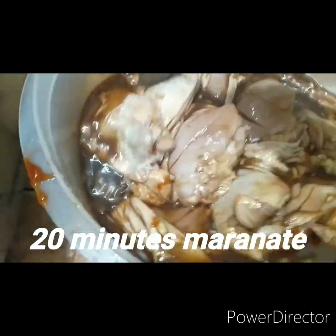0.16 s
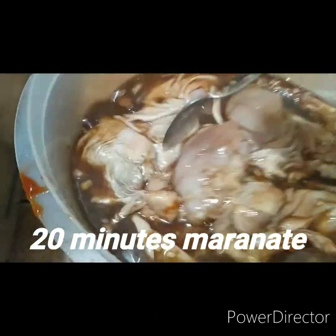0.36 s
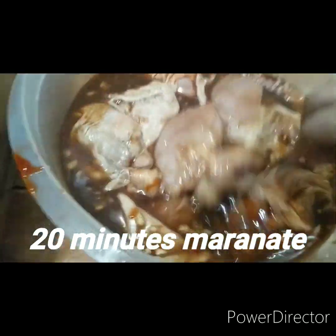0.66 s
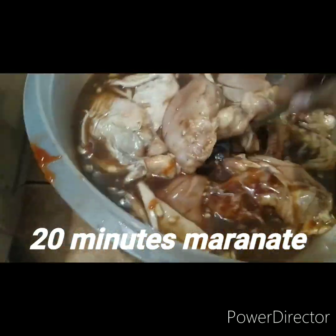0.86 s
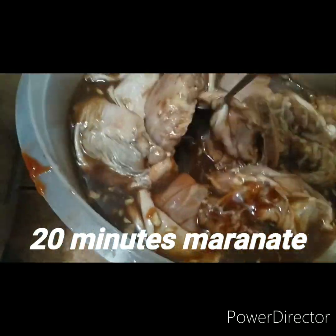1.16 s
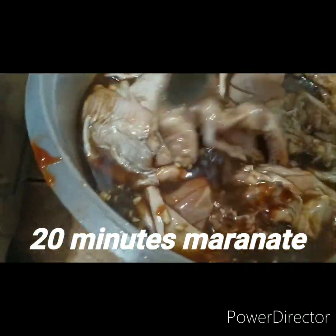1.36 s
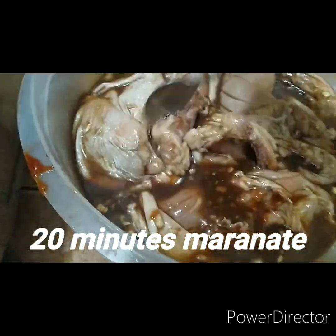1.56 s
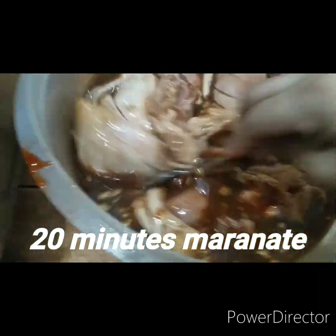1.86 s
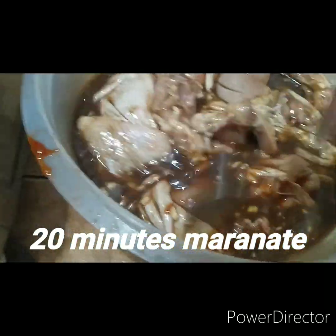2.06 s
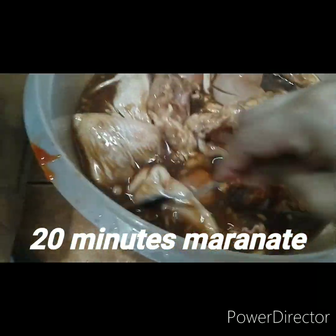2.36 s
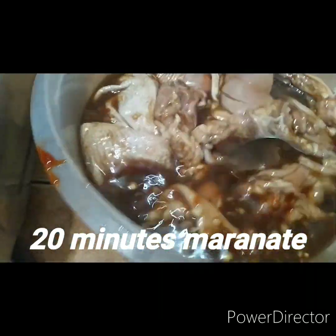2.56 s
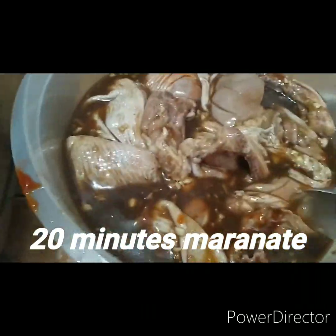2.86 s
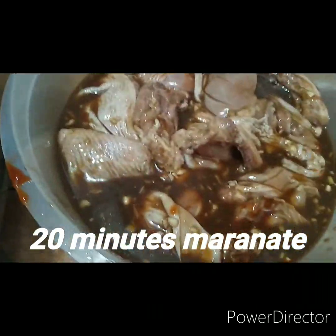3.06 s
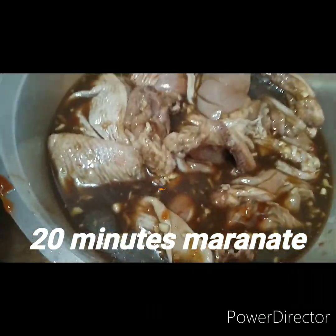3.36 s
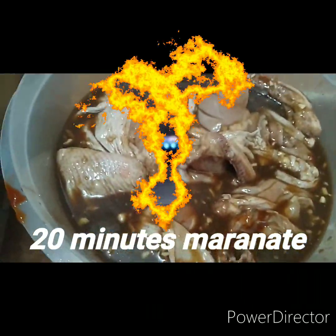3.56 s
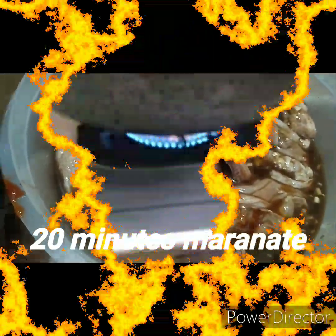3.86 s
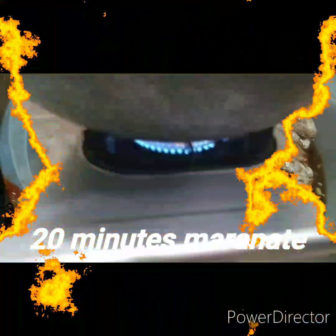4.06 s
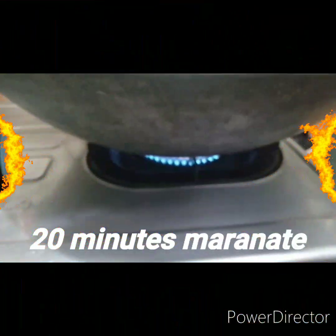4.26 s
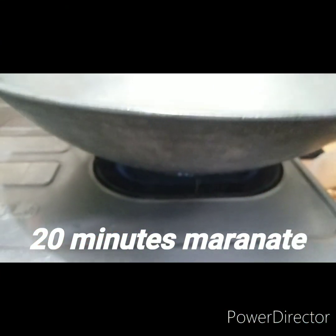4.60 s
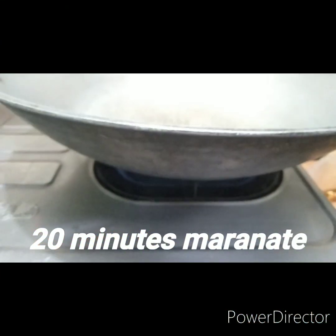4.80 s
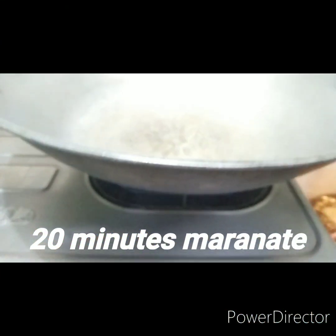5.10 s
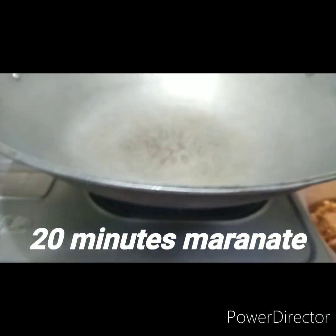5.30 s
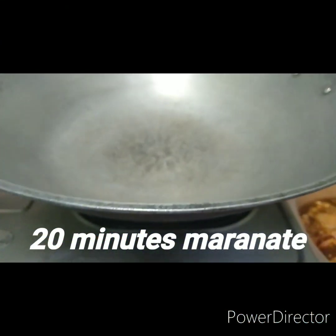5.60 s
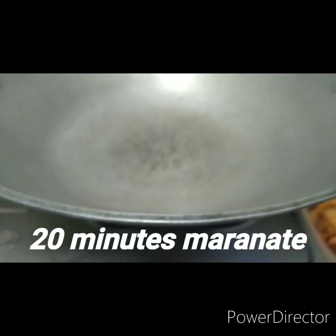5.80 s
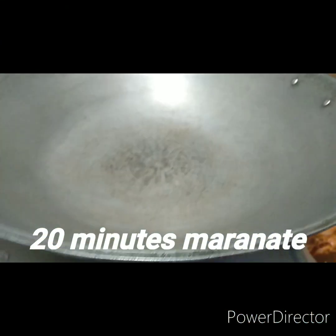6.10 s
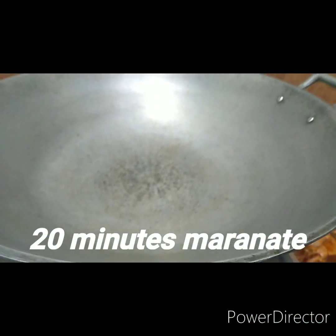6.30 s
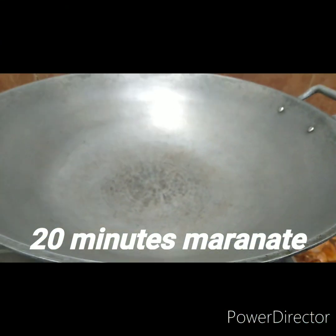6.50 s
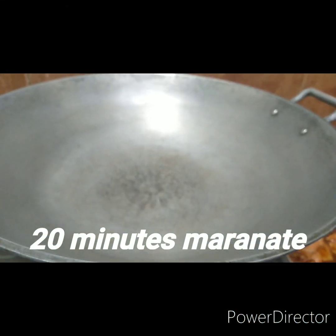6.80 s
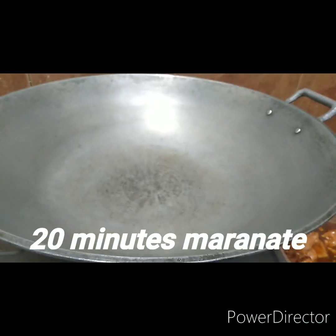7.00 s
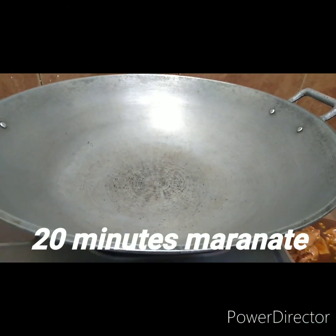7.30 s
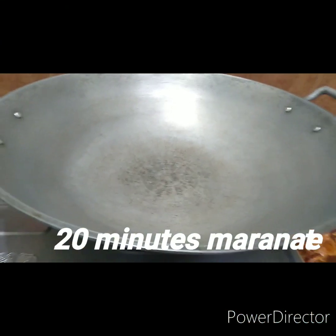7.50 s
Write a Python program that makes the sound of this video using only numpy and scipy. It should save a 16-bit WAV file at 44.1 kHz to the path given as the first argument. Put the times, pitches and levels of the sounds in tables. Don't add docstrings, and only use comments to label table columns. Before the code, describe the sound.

In a small kitchen, close microphone, quiet hiss and low hum carry tiny wet ticks and a faint high whistle. A metal spoon then knocks a meat-filled bowl with short damped clacks and small wet pops, followed by bright gritty scrapes. After a brief silence, a gas stove hisses over a fuller hum, with soft pan thuds, then a light clink and a louder, rattling metal clink.

```python
import sys
import numpy as np
from scipy import signal
from scipy.fft import rfft, irfft
from scipy.io import wavfile

SR = 44100
rng = np.random.default_rng(int(sys.argv[2]) if len(sys.argv) > 2 else 0)


def materialize(psi):
    bounded = np.clip(np.atleast_2d(psi).T, -1, 1)
    quanta = np.round(bounded * 32767).astype(np.int16)
    wavfile.write(sys.argv[1], SR, quanta)


def rack_gain(trim_db):
    fader = np.asarray(trim_db, float)
    return 10 ** (fader / 20)


N = 337365

# [t/s, peak level/dB, dull thump level/dB, ring tilt/(dB per octave), bright click level/dB]
KNOCKS = [(1.743, -36, -21, -12, -22), (2.196, -13.5, -28, 4, 0.5), (2.213, -26, -28, 5, -17),
          (2.4427, -14.5, -42, 0, -11), (2.462, -47, -31, -4, -20), (2.8005, -13.5, -10, 2, -2),
          (2.895, -17, -17, -1.5, -9), (2.995, -27, -9, -4, 2), (3.205, -23, -18, 14, 5),
          (3.346, -21.5, -16, -9.5, 3.5), (3.364, -26, -32, -13, -5), (0.855, -31.5, -37, -14, -20),
          (2.9442, -39, -23, -5, -32), (3.323, -35, -27, -4, -36)]
PLACE_UNTIL = [2.3, 2.6, 2.85]
CONTACT_LENGTHS = [2.3, 4.2, 2.85, 2.1]
# [f/Hz, t60/s, level/dB at each of four places]
BOWL_MODES = [(674, 0.015, -10, -18, -13, -11), (810, 0.03, -11, -1.5, -11, -9),
              (960, 0.023, -8, -9, -15, -19), (1200, 0.034, -16, 0, 1.5, 2), (1335, 0.028, 5.5, -9, -4, -2),
              (1552, 0.021, -4, -4, -0.5, -2), (1750, 0.018, -10, -3, -2, -3),
              (2063, 0.02, -4.5, -8.5, -1.5, 7), (2200, 0.016, -3, -10, -10, 2),
              (2442, .022, 4.5, 3.5, -20, -5), (2680, 0.016, -11, -7.5, -21, -13),
              (2870, 0.018, -2, -14, -18, -11), (3400, 0.0085, -15, -10, -13, -7),
              (3750, 0.0073, -16, -10, -12, -16)]
# [f/Hz, level/dB, t60/s]
LOAD_MODES = [(171, -18, 0.037), (365, 10, 0.024), (462, 10.5, 0.046)]
# [f/Hz, level/dB, t60/s]
CLICK_MODES = [(4480, -16, 0.001), (5740, -11, 0.004), (7000, -13, 0.0021), (8200, -9, 0.002),
               (10450, 2, 0.0024), (11500, -7.5, 0.0074)]
# [t/s, level/dB, f/Hz]
BOWL_ROCKS = [(1.86, -45, 186), (1.869, -46, 128), (2.038, -44, 178), (2.55, -62, 290)]
# [t/s, peak level/dB, f/Hz, t60/s]
STRAY_NOTES = [(2.1963, -25, 1320, .015), (2.1972, -25, 2450, .012), (2.2035, -33, 1750, .03),
               (2.895, -17, 2050, .024), (2.8975, -34, 430, .05), (2.899, -31, 2550, .025),
               (2.895, -29, 3700, .012), (2.8953, -25, 1200, .035), (3.2043, -25, 2330, .018),
               (3.2055, -33, 850, .02), (3.3468, -27, 1350, .02), (3.7484, -34, 2300, .01),
               (3.7486, -38, 3900, .012), (4.548, -39, 920, .04), (4.536, -35, 690, .02),
               (2.4435, -27, 1650, .015), (2.8015, -29, 520, .025), (5.389, -39, 5300, .025),
               (5.389, -40, 4600, .03), (5.4075, -42, 2300, .04), (5.4575, -42, 3050, .03),
               (5.4585, -47, 5100, .03), (5.4615, -42, 1600, .025)]
# [t/s, rise/s, hold/s, bright ring level/dB, body rub relative level/dB]
STROKES = [
    (3.203, 0.0029, 0.009, -31, -24),
    (3.3457, 0.0007, 0.0069, -25, -5.5),
    (3.353, 0.0034, 0.051, -29, -8.5),
    (3.412, .004, .012, -40, -8),
    (3.6662, .001, 0.005, -37, -8),
    (3.680, 0.015, .034, -27.5, -28),
    (3.747, .004, .006, -41, 5),
]
DRAG_UNTIL = [3.33, 3.6]
# [t/s, level/dB]
LANDINGS = [(3.2041, -23), (3.3463, -19), (3.6674, -38)]
# [t/s, extra force/dB]
CATCHES = [(3.2062, -2), (3.2132, 9), (3.2165, 5), (3.229, 3), (3.234, 3), (3.240, 4), (3.2483, 4),
           (3.2555, 3), (3.3485, 6), (3.353, 8), (3.3565, 6), (3.3590, 2), (3.3650, 7), (3.3703, 5),
           (3.3750, 2), (3.3815, 2), (3.3856, 4), (3.3896, 2), (3.3968, 5), (3.3997, 4), (3.4017, 5),
           (3.4066, 1), (3.4096, -3), (3.4135, -2), (3.431, 3), (3.4416, 3), (3.6697, 5), (3.6843, 8),
           (3.6907, 6), (3.6961, 6), (3.700, 6), (3.7038, 5), (3.7064, 2), (3.7095, 3), (3.7121, 6),
           (3.7210, 5), (3.7281, 4), (3.7313, 3), (3.7416, 2), (3.7485, 3), (3.7559, 5)]
# [f/Hz, level/dB in first, second, third drag, t60/s]
SPOON_MODES = [(3625, -35, -30, -19, 0.046), (4000, -35, -29, -17, .04), (4680, -18, -20, -22, 0.025),
               (5060, -26, -19, -13, 0.048), (5380, -29.5, -20, -18, .03), (6630, -15, -19, -21, 0.025),
               (7570, -14, -14.5, -32, .015), (8050, -15, -17, -19, .07), (8400, -19, -16, -21, .015),
               (8980, -20, -20, -11, 0.11), (9250, -7.5, -19, -14, 0.023), (9710, -15, -5, -10, .022),
               (10185, -11, -4, -6, 0.03), (10500, -13, -17, -10, .02), (10730, -2, -5, -4, 0.032),
               (11090, -5, 0.5, -2, 0.04), (11250, -12, -4, -8, 0.016), (12480, -12, -15, -18, .02),
               (12050, 3, -12, -22, .035), (12300, -19, -12, -14, 0.0204), (13400, -21, -16, -16, 0.03),
               (14000, -15, -12, -8, .03), (14600, -21, -10, -12, .015), (15150, -21, -14, -11, .015)]
GRIT_LEVELS = [-1, -3, -4]
# [f/Hz, level/(dB per Hz)]
GRIT_COLOUR = [(290, -51), (500, -20.5), (726, -27), (968, -7.5), (1150, -27), (1600, -8.5), (3680, -11.5),
               (4500, -21), (7030, -18.5), (10800, -3), (15500, -19)]
# [f/Hz, width/Hz]
DRAG_NOTCHES = [(6120, 330), (7050, 350)]
# [t/s, rise/s, hold/s, rms level/dB]
SLOSHES = [(2.897, .003, .004, -52), (2.916, 0.019, 0.016, -38), (3.488, .01, 0.011, -56),
           (3.556, 0.016, 0.039, -50), (3.66, .015, .008, -56)]
# [t/s, peak level/dB, f/Hz, t60/s]
PLOPS = [(2.4635, -37, 2980, .012), (2.467, -38, 1000, .03), (2.9315, -33, 1400, .015),
         (2.937, -31, 1500, .015), (2.9445, -29, 1500, 0.014), (2.9490, -34, 1300, .015),
         (2.9545, -35, 1500, .015), (2.9635, -37, 2100, .01), (2.9715, -41, 1400, .012),
         (2.995, -31.5, 1200, .02), (2.2005, -29, 2400, .02), (2.2055, -33, 2000, .02),
         (2.219, -33, 2100, .02), (2.2245, -40, 2700, .015), (2.9025, -32, 2290, .015),
         (.856, -35, 1300, .012), (.8565, -40, 2300, .008), (2.4440, -27, 2500, .015),
         (2.4455, -30, 1200, .025), (2.803, -27, 1900, .012)]
# [t/s, peak level/dB, f/Hz]
TICKS = [(.1274, -61, 6140), (.1999, -40, 11500), (.214, -57, 7000), (0.243, -40, 9600),
         (.2768, -38, 11500), (.4494, -46, 14300), (.4853, -42, 10800), (.6898, -39, 11000),
         (.69, -38, 13000), (1.1613, -35.5, 10500), (1.3992, -39, 13000), (1.5374, -45, 8400),
         (1.8362, -43, 10100), (6.13, -38, 12500), (6.3964, -59, 5180), (7.0818, -37, 12800),
         (7.2004, -45, 12200)]
# [t/s, peak level/dB, sharp edge level/dB]
PAN_THUDS = [(4.162, -34, -12), (4.5262, -26, -18), (4.5312, -18.5, -20), (4.5412, -23, -30),
             (4.6195, -26, -24), (4.631, -34, -24)]
# [f/Hz, level/dB, t60/s]
PAN_MODES = [(700, 3, 0.02), (790, -1, 0.012), (900, 2, 0.02)]
# [f/Hz, level/dB, t60/s]
PAN_EDGE_MODES = [(1960, -8, .02), (2500, -5, .015), (2920, 4, .015), (3270, 2, .015), (4700, -7, .025),
                  (5600, -9, .015)]
# [t/s, peak level/dB, lowest f/Hz, length/ms]
SNAPS = [
    (4.533, -32, 2000, 3.0),
    (5.3887, -32, 3500, 6.0),
    (5.457, -36, 2800, 8.0),
    (5.693, -27, 1900, 12),
]
# [t/s, peak level/dB]
CLINKS = [
    (5.3894, -26),
    (5.692, -14),
]
# [f/Hz, level/dB at first clink, level/dB at second clink, t60/s]
METAL_MODES = [(2000, -38, -12, 0.13), (2150, -26, -10, 0.11), (2330, -5, -0.5, 0.071),
               (2377, -22, 0.5, 0.045), (2520, -23, -4.5, 0.035), (2810, -9, -5, 0.055),
               (2620, -19, -9, 0.037), (3110, -9, -16, .04), (3272, 3.5, -18, 0.05), (3310, -7, -14, 0.074),
               (3663, -20, -11.5, 0.13), (4280, -9, -18, 0.036), (4610, -7, -10.5, 0.066),
               (5200, -12, -21, 0.071), (5610, -10, -6, 0.075), (6830, -15, -8.5, 0.059),
               (6830, -19, -29, 0.045), (7670, -24, -25, .05), (11400, -11, -19, .02),
               (13500, -19, -17, 0.1), (14800, -18, -11, 0.022)]
# [t/s after the clink, level/dB]
CLINK_BOUNCES = [(.0062, -4), (.013, -14)]
# [t/s, rise/s, hold/s, f/Hz, rms level/dB]
SQUEAKS = [(1.94, 0.05, .17, 4500, -63), (3.532, .008, 0.12, 2770, -57.5),
           (3.537, 0.035, 0.21, 3810, -59.5)]
# [t/s, f/Hz, rms level/dB]
WHISTLE = [(.445, 9950, -75), (.47, 9880, -60), (.50, 9800, -56), (.525, 9800, -63), (.56, 9760, -57),
           (.595, 9660, -54), (.63, 9580, -62), (.645, 10020, -61), (.67, 9980, -55), (.705, 9860, -56),
           (.73, 9800, -68), (.76, 9950, -60), (.80, 9890, -56), (.825, 9980, -57), (.85, 9790, -55),
           (.89, 9850, -57), (.93, 9900, -63), (.97, 9830, -76)]
# [t/s, height/full scale, rise/s]
LURCHES = [(3.198, -0.026, 0.0092), (3.219, 0.02, 0.024), (3.34, -0.028, 0.0093), (3.375, 0.013, 0.035),
           (3.45, -0.0068, 0.059), (3.731, 0.00099, 0.026), (4.043, 0.03, 0.047)]
# [f/Hz, level/(dB per Hz)]
BOWL_ROOM = [(180, -48), (300, -35), (326, -13), (446, -11), (501, -5.5), (745, -6.5), (986, -4),
             (1440, -6.5), (2330, -8.5), (3300, -16), (4590, -21), (5330, -23.5), (8050, -27),
             (10800, -15.5), (15600, -29)]
STOVE_ROOM = [(210, -7.5), (360, -4.5), (421, -2), (509, -7.5), (596, 0), (676, -4.5), (732, -2.5),
              (972, -3), (1400, -2), (2210, -5), (3380, -11), (8170, -27), (10500, -23), (12900, -14),
              (15600, -27.5)]
# [f/Hz, width/Hz, rms level/dB]
BOWL_HUM = [(24, 34, -62.5), (73.8, 9.5, -64.5), (116, 14, -70), (144.6, 25.4, -57.5), (178, 19, -65.5),
            (243, 110, -70), (1000, 32, -61)]
STOVE_HUM = [(24.1, 21, -61.5), (91.7, 9.2, -58.5), (133, 20, -66.5), (163, 33, -57.5),
             (207.8, 21.6, -56.5), (243.3, 16, -54.5), (295.6, 32.5, -51.5), (346.6, 13, -62.5),
             (425, 13, -65), (6900, 250, -76), (13680, 50, -70)]
# [f/Hz, rms level/dB]
MOTORS = [
    [(39, -59.5), (78, -64.5)],
    [(46, -60.5), (92, -73)],
]
# [t/s, depth/dB, time
# to deepest/s]
DUCKS = [
    (.15, -1, 0.099),
    (1.15, -1, 0.17),
    (2.2, -2.5, 0.088),
    (3.215, -15.5, 0.046),
    (3.35, -3.5, 0.094),
]
# [t/s, length/s, f/Hz, width/Hz]
DROPOUTS = [(3.375, .075, 6050, 260), (3.365, .04, 6850, 250), (3.685, .08, 6150, 360),
            (3.69, .062, 7150, 620), (3.715, .03, 4650, 200)]

HISS_TOP_HZ = 15480


def knocks():
    out = np.zeros(N)
    for s, db, thump_db, tilt_db, click_db in KNOCKS:
        place = np.searchsorted(PLACE_UNTIL, s)
        contact_ms = CONTACT_LENGTHS[place]
        contact = crack(contact_ms)
        touch = contact * np.exp(-1000 * np.arange(len(contact)) / SR / (0.75 * contact_ms))
        body = 0
        for hz, t60, *place_db in BOWL_MODES:
            mode_db = place_db[place] + tilt_db * np.log2(hz / 1500)
            body = body + rack_gain(mode_db) * peak_one(ring(touch, hz, t60))
        body = above(above(body, 660), 410)
        click_sound = above(contact, 3400)
        click_sound += sum(rack_gain(d) * peak_one(ring(contact, hz, t60)) for hz, d, t60 in CLICK_MODES)
        load = above(sum(rack_gain(d) * ring(np.abs(contact), hz, t60) for hz, d, t60 in LOAD_MODES), 130)
        hit = peak_one(body) + rack_gain(click_db) * peak_one(click_sound) + rack_gain(thump_db) * peak_one(load)
        place_at(out, s, rack_gain(db) * hit)
    return out + sum(strike([s], db, hz, 0.34) for s, db, hz in BOWL_ROCKS)


def spoon_drags():
    bright, body = drag_forces()
    grit = grains(7000, 2.6) * rack_gain(2.4 * drift(300))
    catch_rise_s = 0.0008
    catch_db = sum(db * bump(s, catch_rise_s) for s, db in CATCHES)
    out = (rack_gain(np.array(GRIT_LEVELS)) @ bright) * rack_gain(0.35 * catch_db - 2.5) * coloured(grit, GRIT_COLOUR)
    bright *= rack_gain(catch_db - 2.5)
    caught = np.round((np.array(CATCHES)[:, 0] + catch_rise_s) * SR).astype(int)
    landing_s, landing_db = np.transpose(LANDINGS)
    for k, (hz, *db, t60) in enumerate(SPOON_MODES):
        force = rack_gain(np.array(db)) @ bright
        drive = rack_gain(-19) / np.sqrt(t60 * 100) * np.roll(grit, k * k * 20) * force
        drive[caught] += rack_gain(-6) * force[caught]
        landed = np.round((landing_s + rng.uniform(0, 0.0019)) * SR).astype(int)
        drive[landed] += rack_gain(landing_db + db)
        out += ring(drive, hz, t60)
    for hz, width_hz in DRAG_NOTCHES:
        out = between(out, hz - width_hz / 2, hz + width_hz / 2, 2, "bandstop")
    wet = grains(1500, 3.8) * body
    rubbed = 0
    for k, (hz, t60, *db) in enumerate(BOWL_MODES):
        rubbed = rubbed + rack_gain(np.mean(db) - 25) * ring(np.roll(wet, k * 10), hz, 0.54 * t60)
    return above(out, 450) + above(rubbed, 620)


def drag_forces():
    ring_fall, rub_fall, slosh_fall = 800, 420, 650
    bright, body = np.zeros((3, N)), np.zeros(N)
    for s, rise_s, hold_s, db, rub_db in STROKES:
        drag = np.searchsorted(DRAG_UNTIL, s)
        if drag == 0:
            pace = 0.38
        elif rise_s < 0.003:
            pace = 2499 / ring_fall
        else:
            pace = 1
        bright[drag] += rack_gain(db) * swell(s, rise_s, hold_s, pace * ring_fall)
        body += rack_gain(db + rub_db) * swell(s, rise_s, hold_s, pace * rub_fall)
    body += sum(rack_gain(db) * swell(*shape, slosh_fall) for *shape, db in SLOSHES)
    return bright, body


def stray_notes():
    out, click = np.zeros(N), unit_click()
    for s, db, hz, t60 in STRAY_NOTES:
        place_at(out, s, rack_gain(db) * peak_one(ring(ring(click, hz, t60), hz, 3 / hz)))
    return out


def plops():
    out, click = np.zeros(N), unit_click()
    for s, db, hz, t60 in PLOPS:
        pair = ring(click, 0.94 * hz, t60) + ring(click, 1.13 * hz, t60)
        place_at(out, s, rack_gain(db) * peak_one(ring(pair, hz, 0.35 * t60)))
    return out


def ticks():
    out, click = np.zeros(N), unit_click()
    for s, db, hz in TICKS:
        for pitch_hz in (0.93 * hz, min(1.075 * hz, 15200)):
            burst = ring(ring(click, pitch_hz, 44 / hz), pitch_hz, 37 / hz)
            place_at(out, s, rack_gain(db - 19.5) * burst)
    return out


def pan_thuds():
    s, db, edge_db = np.transpose(PAN_THUDS)
    body = sum(strike(s, db + d - 3.5, hz, t60) for hz, d, t60 in PAN_MODES)
    body = between(above(above(body, 700), 700), 610, 1100, 3)
    return body + sum(strike(s, db + edge_db + d - 5.5, hz, t60) for hz, d, t60 in PAN_EDGE_MODES)


def clinks():
    s, db = np.transpose(CLINKS)
    rattle = drift(180)
    out = 0
    for k, (hz, first, second, t60) in enumerate(METAL_MODES):
        mode = strike(s, db + np.array([first, second]) - 10, hz, t60)
        out = out + mode * rack_gain(3.5 * np.roll(rattle, k * SR // 10))
    out = above(out, 2250)
    return out + sum(rack_gain(d) * np.roll(out, round(lag * SR)) for lag, d in CLINK_BOUNCES)


def snaps_and_rustle():
    out = np.zeros(N)
    for s, db, low_hz, length_ms in SNAPS:
        place_at(out, s, rack_gain(db) * above(crack(length_ms), low_hz))
    brush = swell(4.882, 0.0049, 0.011, 940)
    return out + rack_gain(-41) * brush * coloured(grains(4000, 2.8), STOVE_ROOM)


def whistle():
    t = np.arange(N) / SR
    s, hz, db = np.transpose(WHISTLE)
    pitch_hz = np.interp(t, s, hz) + 100 * drift(220)
    level_db = np.interp(t, s, db, -120, -120) - 1.5 + 4 * drift(50)
    return rack_gain(level_db) * np.sqrt(2) * np.sin(2 * np.pi * np.cumsum(pitch_hz) / SR)


def squeaks():
    out, flutter = np.zeros(N), drift(70)
    glide_hz_per_s = -200
    for s, rise_s, hold_s, hz, db in SQUEAKS:
        age = np.arange(N) / SR - s
        turns = hz * age + 0.5 * glide_hz_per_s * hz / 10000 * age ** 2
        out += rack_gain(db) * swell(s, rise_s, hold_s, 256) * (0.6 + flutter) * np.sin(2 * np.pi * turns)
    return out


def lurches():
    pushes = sum(height * bump(s, rise_s) for s, height, rise_s in LURCHES)
    return signal.sosfilt(signal.butter(2, 45, fs=SR, output="sos"), pushes)


def kitchen(x):
    t60_s = 0.16
    t = np.arange(int(0.3 * SR)) / SR
    tail = rng.standard_normal(len(t)) * rack_gain(-60 * t / t60_s) * (t > 0.006)
    tail = signal.lfilter([1], [1, -0.6], tail)
    return signal.fftconvolve(x, tail / np.sqrt(np.sum(tail ** 2)))[:N]


def room_noise(db, colour, hum, motor, patchy_db):
    hiss = coloured(rng.standard_normal(N), colour) * rack_gain(patchy_db * drift(12))
    waver = 0
    for hz in (600, 850, 1200, 1700, 2400, 3400):
        waver = waver + (rack_gain(0.9 * drift(16)) - 1) * between(hiss, hz / 1.186, hz * 1.17, 1)
    hiss = steep_top(hiss + waver, 9, 50)
    low = np.zeros(N)
    for hz, width_hz, d in hum:
        t60 = 1.45 / width_hz
        low += rack_gain(d) * rms_one(ring(ring(rng.standard_normal(N), hz, t60), hz, t60))
    for hz, d in motor:
        level = rack_gain(d + 4.5 + 2 * drift(5.5))
        low += level * np.sin(2 * np.pi * np.cumsum(hz + 0.865 * drift(1.77)) / SR)
    return rack_gain(db) * hiss + low


def crack(contact_ms):
    t = np.arange(int(0.1 * SR)) / SR
    contact = 0.22 * rng.standard_normal(len(t)) * np.exp(-1000 * t / contact_ms)
    contact[0] = -0.405
    return contact


def grains(per_s, spread_db):
    sizes = rack_gain(spread_db * np.minimum(rng.exponential(1, N), 4)) * rng.choice([-1, 1], N)
    return rms_one(sizes * (rng.random(N) < per_s / SR))


def ring(clicks, hz, t60):
    r, w = rack_gain(-60 / (t60 * SR)), 2 * np.pi * hz / SR
    return signal.lfilter([0, np.sin(w)], [1, -2 * r * np.cos(w), r * r], clicks + 1e-18)


def strike(times, db, hz, t60):
    clicks = np.zeros(N)
    clicks[np.round(np.asarray(times) * SR).astype(int)] = rack_gain(db)
    return ring(clicks, hz, t60)


def unit_click():
    return np.eye(1, 2000)[0]


def place_at(out, s, sound):
    at = round(s * SR)
    out[at:at + len(sound)] += sound


def swell(s, rise_s, hold_s, fall_db_per_s):
    age = np.arange(N) / SR - s
    fall = rack_gain(-fall_db_per_s * np.clip(age - rise_s - hold_s, 0, 0.5))
    return np.clip(age / max(rise_s, 1e-4), 0, 1) * fall


def bump(s, rise_s):
    age = np.maximum(np.arange(N) / SR - s, 0) / rise_s
    return age * np.exp(1 - age)


def drift(rate):
    knots = np.arange(0, N / SR + 2 / rate, 0.5 / rate)
    return rms_one(np.interp(np.arange(N) / SR, knots, rng.standard_normal(len(knots))))


def coloured(x, spectrum):
    hz, db = np.transpose(spectrum)
    grid = np.maximum(np.arange(N // 2 + 1) * SR / N, 1)
    return rms_one(irfft(rfft(x) * rack_gain(np.interp(np.log(grid), np.log(hz), db)), N))


def above(x, hz):
    return signal.sosfilt(signal.butter(2, hz, "high", fs=SR, output="sos"), x)


def between(x, low_hz, high_hz, order, kind="band"):
    return signal.sosfilt(signal.butter(order, [low_hz, high_hz], kind, fs=SR, output="sos"), x)


def steep_top(x, order, depth_db):
    return signal.sosfilt(signal.ellip(order, 0.5, depth_db, HISS_TOP_HZ, fs=SR, output="sos"), x)


def rms_one(x):
    return x / np.sqrt(np.mean(x ** 2) + 1e-20)


def peak_one(x):
    return x / np.abs(x).max()


def dropouts(x):
    t, out = np.arange(N) / SR, x.copy()
    for s, length_s, hz, width_hz in DROPOUTS:
        edges_hz = [hz - width_hz / 2, hz + width_hz / 2]
        band = signal.sosfiltfilt(signal.butter(3, edges_hz, "band", fs=SR, output="sos"), x)
        out -= band * np.clip(np.minimum(t - s, s + length_s - t) / 0.008, 0, 1)
    return out


def scene():
    t = np.arange(N) / SR
    cut_s, resume_s = 3.906, 3.96
    taps = knocks()
    hits = spoon_drags() + pan_thuds() + clinks() + snaps_and_rustle()
    echoes = kitchen(rack_gain(-13.5) * taps + rack_gain(-8.5) * hits)
    near = taps + hits + echoes + stray_notes() + plops() + ticks() + whistle() + squeaks() + lurches()
    by_bowl = room_noise(-47, BOWL_ROOM, BOWL_HUM, MOTORS[0], patchy_db=0.6)
    by_bowl = by_bowl * rack_gain(sum(db * bump(s, rise_s) for s, db, rise_s in DUCKS))
    by_stove = room_noise(-46.5, STOVE_ROOM, STOVE_HUM, MOTORS[1], patchy_db=0.3)
    by_stove = by_stove * rack_gain(-14.5 * np.clip(1 - (t - resume_s) / 0.15, 0, 1))
    before = np.clip((cut_s - t) / 0.0014, 0, 1)
    after = np.clip((t - resume_s) / 0.0033, 0, 1)
    return (before * (near + by_bowl) + after * (near + by_stove))[None]


def top_cut(x):
    return signal.sosfilt(signal.butter(12, 16640, fs=SR, output="sos"), x)


def record(dry):
    finished = steep_top(dropouts(dry), 5, 16)
    return top_cut(finished)


dry = scene()
out = record(dry)
materialize(out)
```